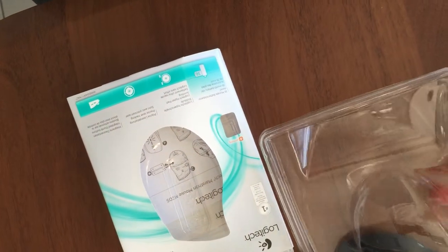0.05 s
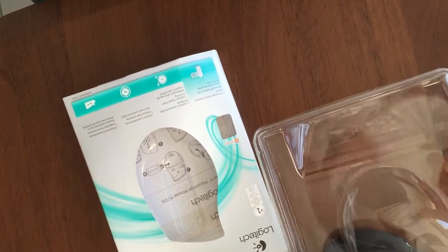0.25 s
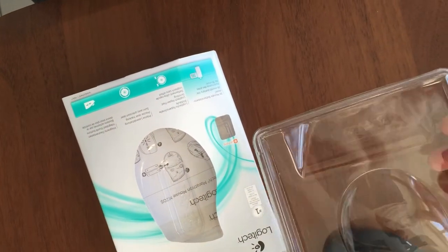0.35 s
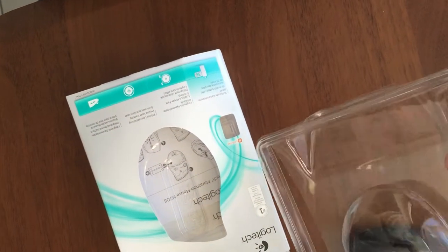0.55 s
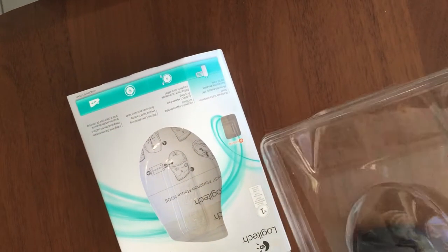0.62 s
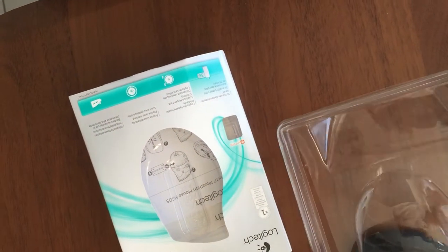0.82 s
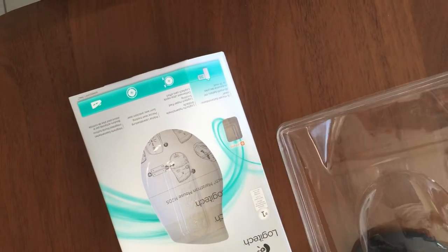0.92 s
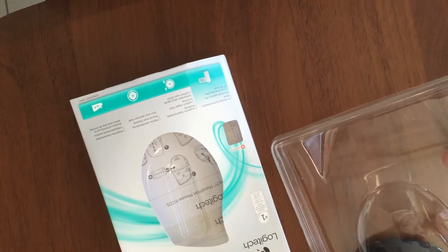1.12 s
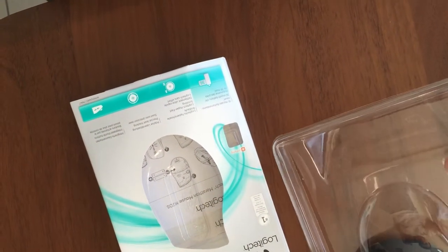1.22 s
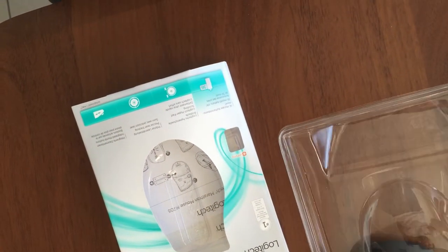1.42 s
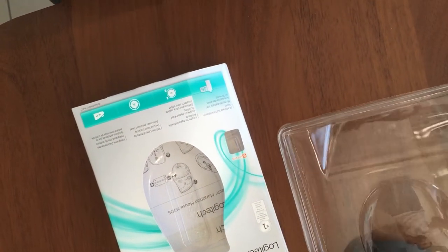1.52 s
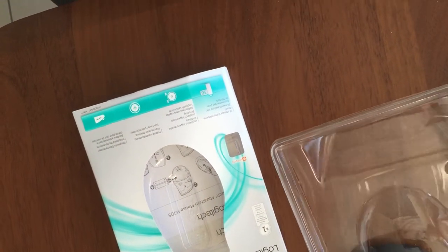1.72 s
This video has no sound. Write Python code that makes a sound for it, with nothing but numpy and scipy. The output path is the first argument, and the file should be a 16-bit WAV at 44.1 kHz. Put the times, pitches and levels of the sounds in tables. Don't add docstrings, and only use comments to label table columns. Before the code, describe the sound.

A hard thin plastic shell crackles and pops sharply as it is handled over a table indoors

```python
import sys
import numpy as np
from scipy import signal
from scipy.fft import rfft, irfft, next_fast_len
from scipy.io import wavfile

SR = 44100
rng = np.random.default_rng(int(sys.argv[2]) if len(sys.argv) > 2 else 0)


def to_wav(sig):
    pcm = np.clip(np.atleast_2d(sig), -1, 1) * 32767
    pcm = np.round(pcm).astype(np.int16)
    wavfile.write(sys.argv[1], SR, pcm.T)


def voltage_ratio(level):
    return 10 ** (np.asarray(level, float) / 20)


N = 77175
LEAD = 4410
LENGTH = N + LEAD

# hz, level_db
AIR_SPECTRUM = [(15, -35.5), (25, -8), (153, -1), (451, -13.5), (714, -15.5), (2840, -25), (4610, -25),
                (14800, -35.5), (16000, -42)]
# hz, t60_s
ROOM_DECAY = [(150, 0.36), (600, 0.42), (2000, 0.46), (5000, 0.27), (12000, 0.22)]
# hz, level_db
WALL_SPECTRUM = [(100, 5), (340, 3.5), (430, -6.5), (530, 1), (1000, -7), (4000, -3.5), (12000, -4)]
# start_s, peak_db, pitch_hz
TABLE_BUMPS = [(-.005, -36, 124), (0.021, -38.5, 122), (.070, -48, 71), (0.109, -43.5, 140),
               (.170, -45, 129), (0.191, -43, 180), (0.222, -24, 194), (0.267, -36, 129), (0.334, -28, 80),
               (0.389, -42, 149), (0.517, -37, 78.6), (.630, -50, 198), (0.809, -37.5, 81.6),
               (0.869, -31, 106.5), (0.951, -38, 160), (1.130, -31.5, 108.6), (1.169, -35.5, 74),
               (1.200, -40, 159.5), (1.220, -39, 128.5), (1.299, -54, 129), (1.460, -52, 149),
               (1.525, -46, 120), (1.590, -50.5, 171)]
# time_s, strain_db
STRAIN = [(0, -42), (.17, -51.5), (.3, -42), (.45, -44.5), (0.562, -52.5), (.61, -46.5), (0.661, -46.5),
          (.78, -54.5), (0.899, -43), (1.04, -56), (1.08, -68.5), (1.189, -36), (1.298, -82), (1.359, -65),
          (1.4, -54), (1.481, -57.5), (1.549, -49.5), (1.75, -63.5)]
# hz, level_db
GRIT_SPECTRUM = [(150, -40), (600, -1), (1200, -8), (2600, -13), (4000, -18), (4800, -31.5), (6600, -30.5),
                 (15000, -48)]
# pitch_hz, level_db, t60_s
SHELL_MODES = [(508, -15.5, 0.3), (790, -2.5, 0.082), (894, -6, 0.21), (1182, -0.5, 0.098),
               (1335, -2.5, 0.11), (1585, -4.5, 0.13), (2000, -17, 0.12), (2180, -21, 0.05),
               (2524, -13.5, 0.16), (4170, -20.5, 0.086), (4240, -14.5, 0.043), (5380, -12, 0.048),
               (5600, -18, 0.11), (6550, -29, 0.31)]
# start_s, peak_db, tilt_db_per_octave
SHELL_BLOWS = [
    (0.2147, -14, 4.5),
    (.2203, -13.5, 3),
    (.2246, -10, -1.5),
    (.2300, -12.5, 1),
    (0.2438, -21, 1.5),
    (.2675, -25.5, 2.5),
]
# start_s, peak_db, pitch_hz, t60_s
DOME_POPS = [(0.2258, -12.5, 699, 0.034), (0.334, -24.5, 797, 0.046), (0.339, -16, 654, 0.04),
             (0.515, -49, 692, 0.2), (0.617, -37, 676, 0.056), (0.6648, -12, 726, 0.024),
             (0.680, -20, 760, 0.0092), (.685, -24.5, 790, 0.02), (.696, -28, 604, .03),
             (0.706, -27.5, 698, 0.024), (0.8, -32, 994, 0.093), (0.8755, -27.5, 350, 0.031),
             (.876, -34, 784, 0.024), (0.896, -28.5, 528, 0.05), (0.915, -28.5, 729, 0.036),
             (0.939, -36, 633, 0.11), (1.028, -40.5, 708, 0.066), (1.1305, -25.5, 574, 0.096),
             (1.179, -30, 913, 0.043), (1.382, -50, 886, 0.15), (1.502, -38.5, 756, 0.05),
             (1.514, -42.5, 578, 0.087), (1.599, -37, 1059, 0.06), (1.614, -38.5, 610, 0.077),
             (1.646, -34, 744, 0.027), (1.66, -37, 690, 0.066)]
# start_s, peak_db, pitch_hz, t60_s
RIM_TWANGS = [(-.002, -29, 947, 0.098), (0.000, -36, 238, 0.082), (.002, -32, 1391, 0.12),
              (.005, -37, 401, 0.24), (.033, -35, 910, 0.046), (0.075, -34.5, 1345, 0.063),
              (0.091, -35.5, 1330, 0.027), (0.214, -29.5, 235.3, 0.28), (.266, -24.5, 1637, 0.089),
              (0.299, -31, 1546, 0.31), (0.337, -32.5, 325, 0.166), (0.411, -44, 226, 0.15),
              (.664, -32, 338, 0.14), (0.6654, -23.5, 1058, .05), (.670, -31, 481, .08),
              (0.708, -40, 278, 0.14), (0.799, -29.5, 468.5, 0.14), (1.140, -41, 291, 0.16),
              (1.663, -45.5, 250, 0.071)]
# start_s, peak_db, pitch_hz, t60_s
RIB_PINGS = [(0.4685, -38.5, 3365, 0.015), (0.6646, -25.5, 3520, 0.015), (0.668, -28, 1478, .04),
             (0.8, -41, 1766, 0.07), (.912, -38.5, 1570, 0.053), (.913, -31.5, 3650, 0.018),
             (.944, -42, 3180, .02), (.988, -47, 2900, 0.017), (1.020, -48.5, 2600, .03),
             (1.381, -47, 2600, 0.026), (1.400, -56, 2610, 0.035), (1.5025, -34, 3506, 0.0089),
             (1.5022, -44.5, 4204, 0.009), (1.522, -41, 2800, .02), (1.566, -57, 6700, 0.016),
             (1.597, -35, 1756, .04)]
# hz, level_db
SHEET_SPECTRUM = [(290, -40), (520, -8), (760, -1.5), (2600, -10.5), (4200, -19.5), (7750, -30),
                  (11000, -37.5), (15000, -36)]
# start_s, peak_db,
# tilt_db_per_octave, burst_s, bright_hz
SHARP_SNAPS = [(-.030, -11, 0, 0.017, 1350), (0.2005, -33, 2.5, 0.0052, 1000),
               (0.2146, -5, 2.5, 0.0015, 2818), (0.2175, -9, 1, 0.0021, 3336),
               (0.2195, -9, 0, 0.003, 2605), (0.2243, -4.5, 2.5, 0.002, 5300),
               (0.2274, -12, 4, 0.0028, 2516), (0.2308, -10.5, 2, 0.0029, 5600),
               (0.2363, -18.5, -3, 0.002, 1207), (0.2454, -24, 3, 0.0049, 3915),
               (0.2705, -22, 16.5, 0.0035, 14340),
               (0.468, -37, 3, 0.0029, 6200), (0.619, -37, -3.5, 0.0026, 2380),
             (0.664, -14, 2.5, 0.0014, 6250), (0.7982, -27, 3, 0.0029, 7900),
             (0.9103, -30, 5.5, 0.0056, 6260), (1.1271, -37, -2.7, 0.0087, 3000),
             (1.1714, -31, -1, 0.018, 3390), (1.177, -29, 2.5, 0.0031, 4070),
             (1.3810, -42.5, 5, 0.00393, 2600), (1.502, -44, 7, 0.0046, 3770),
             (1.516, -39.5, 0.5, 0.0077, 2830), (1.5547, -39.5, -0.1, 0.0061, 2650),
             (1.597, -27, 3, 0.006, 2540)]
# start_s, peak_db, tilt_db_per_octave, burst_s
SOFT_CRACKLES = [(0.331, -35, 0, 0.0086), (0.5936, -46, 2, 0.0072), (0.61, -39.5, 0.5, 0.0058),
                 (0.824, -40, -0.5, 0.0047), (0.83, -41.5, -2.5, 0.0075), (0.87, -42, -4, 0.004),
                 (0.906, -38, 3.5, 0.0092), (0.9304, -34, -2, 0.0078), (0.9384, -34.5, -2, 0.0091),
                 (0.964, -45, -1.5, 0.0033), (0.988, -42.5, -0.5, 0.0067), (1.0125, -48.5, -2, 0.0096),
                 (1.028, -48, -4, 0.0058), (1.16, -32.5, -8.5, 0.0055), (1.1882, -37, -9, 0.006),
                 (1.191, -34, -5.5, 0.0061), (1.391, -49, 5.5, 0.008), (1.406, -48.5, 6, .007),
                 (1.425, -51, 5, .006), (1.5907, -33.5, 1.5, 0.0046)]
# start_s, peak_db, tilt_db_per_octave, burst_s
RUSTLE = [
    (0.000, -31.5, 2, 0.017),
    (0.019, -32, 1, .015),
    (0.038, -38, 0.5, .015),
    (0.253, -28, 1.5, .012),
    (0.269, -28, 4, 0.011),
    (.287, -31, 1.5, .015),
    (0.311, -36, 1.5, .015),
    (0.349, -36.5, -0.5, 0.016),
    (0.671, -31, -0.5, 0.0089),
]

AIR_DB, ROOM_DB = -65, -9
BUMP_DB, BUMP_T60_S, BUMP_RISE_S = -7, 0.1, 0.0035
CREAK_DB, GRAINS_PER_S, GRAIN_SCATTER_DB = -7.5, 3000, 3
SHELL_DAMPING, SHELL_SCATTER_DB, SHELL_RISE_S = 0.42, 2, 0.0003
POP_DB, POP_RISE_S, POP_SIDE_DB = -1.5, 0.00085, -5.5
POP_SPREAD, TWANG_SPREAD = 0.13, 0.07
PITCH_WANDER = 0.004
SNAP_DB, SNAP_RISE_S, SNAP_T60_S = 0.5, 0.0001, 0.026
CRACKLE_HZ, CRACKLE_RISE_S = 3000, 0.003
FIRST_SLIP_GAIN, FIRST_SLIP_S = 2.9, 0.00077
GRAINY_DB, RIPPLE_DB = 3, 1.5
BRIGHT_GAIN, BRIGHT_Q, TILT_FROM_HZ = 1.4, 5, 900
MIC_LOW_HZ, MIC_TOP_HZ = 49, 15350


def unit(x):
    return x / np.sqrt(np.mean(x ** 2) + 1e-20)


def along(points, hz):
    f, v = np.transpose(points)
    return np.interp(np.log(hz + 1), np.log(f + 1), v)


def coloured(x, points):
    m = next_fast_len(len(x) + 8192)
    gain = voltage_ratio(along(points, np.fft.rfftfreq(m, 1 / SR)))
    return irfft(rfft(x, m) * gain, m)[:len(x)]


def causal(gain):
    cepstrum = irfft(np.log(gain + 1e-6))
    half = len(cepstrum) // 2
    cepstrum[1:half] *= 2
    cepstrum[half + 1:] = 0
    return np.exp(rfft(cepstrum))


def ring(hz, level_db, t60_s, rise_s):
    t = np.arange(SR // 4)[:, None] / SR
    step_rad = np.sqrt(2 * np.pi * PITCH_WANDER * np.abs(hz) / SR)
    drift = np.cumsum(rng.standard_normal((len(t), len(hz))), axis=0) * step_rad
    envelope = voltage_ratio(level_db - 60 * t / t60_s) * (1 - np.exp(-t / rise_s)) ** 2
    x = (envelope * np.sin(2 * np.pi * hz * t + drift)).sum(1)
    return x / np.abs(x).max()


def add(track, start_s, x):
    part = track[LEAD + round(start_s * SR):][:len(x)]
    part += x[:len(part)]


def still_air():
    return voltage_ratio(AIR_DB) * unit(coloured(rng.standard_normal(N), AIR_SPECTRUM))


def room(x):
    out, step = np.zeros(len(x) + 2 * SR), SR // 8
    for i in range(0, len(x), step):
        hz, t, z = signal.stft(rng.standard_normal(SR // 2 + SR // 4), SR, nperseg=256)
        decay = voltage_ratio(-60 * t / along(ROOM_DECAY, hz)[:, None])
        tail = signal.istft(z * decay, SR, nperseg=256)[1]
        wet = signal.fftconvolve(x[i:i + step], tail / np.linalg.norm(tail))
        out[i + 130:][:len(wet)] += wet
    return voltage_ratio(ROOM_DB) * coloured(out[:len(x)], WALL_SPECTRUM)


def table_bumps():
    track = np.zeros(LENGTH)
    for start_s, peak_db, pitch_hz in TABLE_BUMPS:
        modes_hz = pitch_hz * np.array([1, 0.62, 1.45])
        knock = ring(modes_hz, rng.normal(0, 1.2, 3), BUMP_T60_S, BUMP_RISE_S)
        add(track, start_s, voltage_ratio(peak_db + BUMP_DB) * knock)
    return track


def creak():
    at, size, sign = rng.random((3, int(GRAINS_PER_S * LENGTH / SR)))
    grains = voltage_ratio(-GRAIN_SCATTER_DB * np.log(size + 0.03)) * (sign - 0.5)
    slips = np.bincount((at * LENGTH).astype(int), grains, LENGTH)
    time_s, strain_db = np.transpose(STRAIN)
    level_db = CREAK_DB + np.interp((np.arange(LENGTH) - LEAD) / SR, time_s, strain_db)
    return voltage_ratio(level_db) * unit(coloured(slips, GRIT_SPECTRUM))


def shell():
    track = np.zeros(LENGTH)
    hz, mode_db, t60_s = np.transpose(SHELL_MODES)
    for start_s, peak_db, tilt in SHELL_BLOWS:
        scatter, detune = rng.standard_normal((2, len(hz)))
        tones_hz = hz * (1 + 0.0045 * detune) * np.sign(detune)
        level_db = mode_db + tilt * np.log2(hz / 1000) + SHELL_SCATTER_DB * scatter
        add(track, start_s, voltage_ratio(peak_db) * ring(tones_hz, level_db, SHELL_DAMPING * t60_s, SHELL_RISE_S))
    return track


def beating_modes(rows, spread):
    track = np.zeros(LENGTH)
    side_db = POP_SIDE_DB * np.array([0.12, 1.7, 1.77, 2.28, 2.86])
    for start_s, peak_db, pitch_hz, t60_s in rows:
        jitter = np.r_[0, rng.normal(0, 0.03, 4)]
        ratios = np.exp(spread * np.array([-0.0643, -1, 1, -2.5, 2.5]) + jitter)
        add(track, start_s, voltage_ratio(peak_db + POP_DB) * ring(pitch_hz * ratios, side_db, t60_s, POP_RISE_S))
    return track


def twangs():
    return beating_modes(RIM_TWANGS + RIB_PINGS, TWANG_SPREAD)


def pops():
    return beating_modes(DOME_POPS, POP_SPREAD)


def slip_burst(t, burst_s, rise_s):
    decay = voltage_ratio(-60 * np.maximum(t - burst_s, 0) / SNAP_T60_S)
    shape = (1 - np.exp(-t / rise_s)) ** 2 * decay
    first = 1 + FIRST_SLIP_GAIN * np.exp(-t / FIRST_SLIP_S)
    grain = np.repeat(rng.standard_normal(128), 16)
    return shape * first * voltage_ratio(GRAINY_DB * grain) * rng.standard_normal(len(t))


def snaps():
    near, around = np.zeros((2, LENGTH))
    t, f = np.arange(2048) / SR, np.fft.rfftfreq(4096, 1 / SR)
    sharp = [(*row, SNAP_RISE_S) for row in SHARP_SNAPS]
    soft = [(*row, CRACKLE_HZ, CRACKLE_RISE_S) for row in SOFT_CRACKLES + RUSTLE]
    for start_s, peak_db, tilt, burst_s, bright_hz, rise_s in sharp + soft:
        burst = slip_burst(t, burst_s, rise_s)
        ripple = np.interp(f, np.linspace(0, SR / 2, 60), rng.standard_normal(60))
        tilt_db = tilt * np.log2(np.maximum(f, TILT_FROM_HZ) / 2500)
        sheet = voltage_ratio(along(SHEET_SPECTRUM, f) + tilt_db)
        damping = 1j * f * bright_hz / BRIGHT_Q
        mode = 1 + BRIGHT_GAIN * damping / (bright_hz ** 2 - f * f + damping)
        body = causal(sheet * voltage_ratio(RIPPLE_DB * ripple)) * mode
        snap = irfft(rfft(burst, 4096) * body)[:len(t)]
        snap = voltage_ratio(peak_db + SNAP_DB) * snap / np.abs(snap).max()
        even = irfft(causal(sheet))[:len(t)]
        add(near, start_s, snap)
        add(around, start_s + burst_s / 2, even * np.linalg.norm(snap) / np.linalg.norm(even))
    return near, around


def scene():
    near, around = snaps()
    rest = pops() + twangs() + shell() + creak() + table_bumps()
    pack = near + rest + room(around + rest)
    return (pack[LEAD:] + still_air())[None]


def band_limit(x):
    return signal.sosfilt(signal.butter(12, 16530, fs=SR, output="sos"), x)


def record(dry):
    low_cut = signal.butter(4, MIC_LOW_HZ, "highpass", fs=SR, output="sos")
    top_cut = signal.ellip(8, 0.5, 42, MIC_TOP_HZ, fs=SR, output="sos")
    mix = signal.sosfilt(np.r_[low_cut, top_cut], dry)
    return band_limit(mix)


dry = scene()
out = record(dry)
to_wav(out)
```